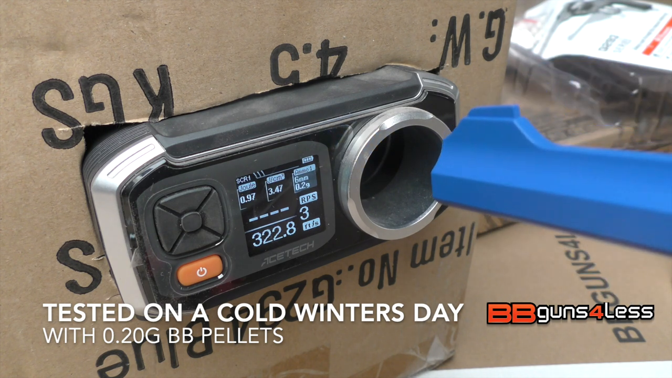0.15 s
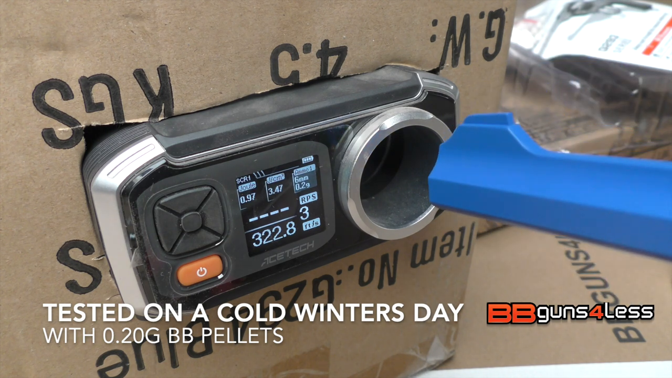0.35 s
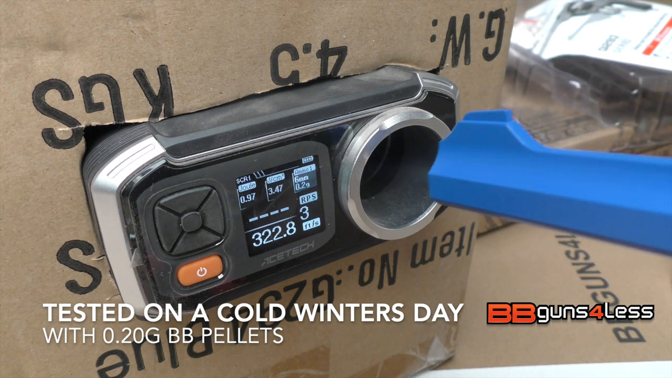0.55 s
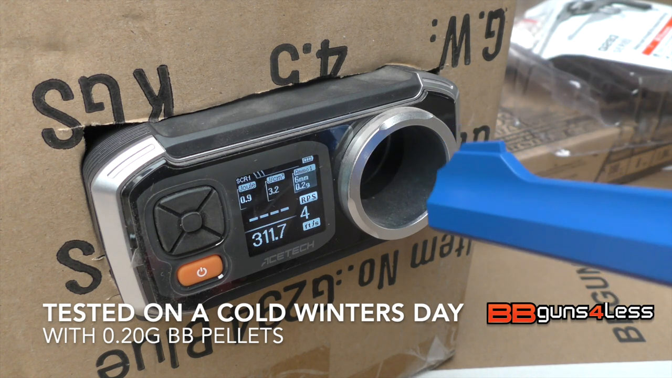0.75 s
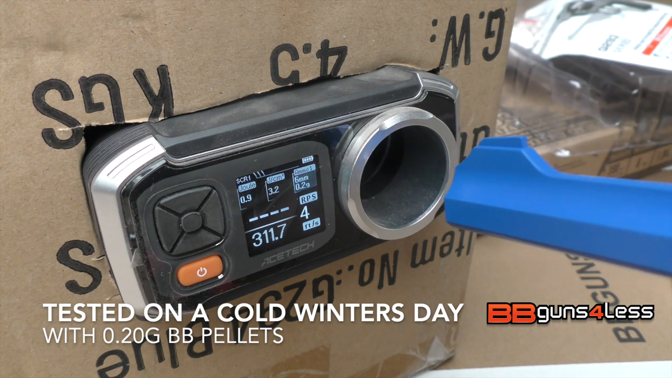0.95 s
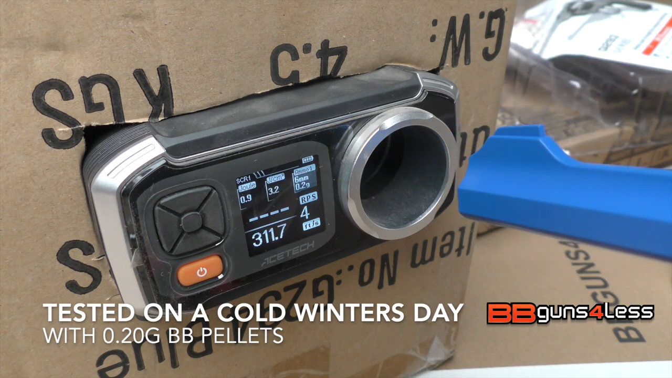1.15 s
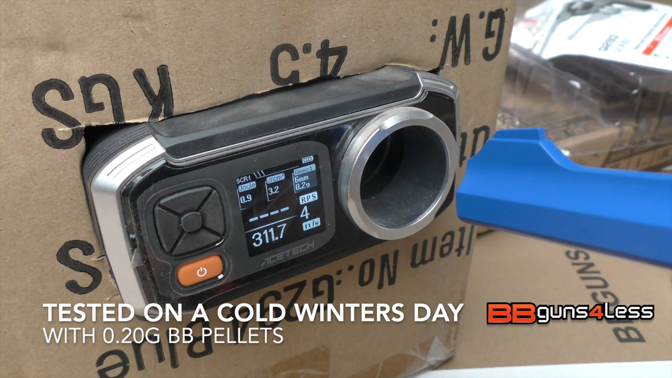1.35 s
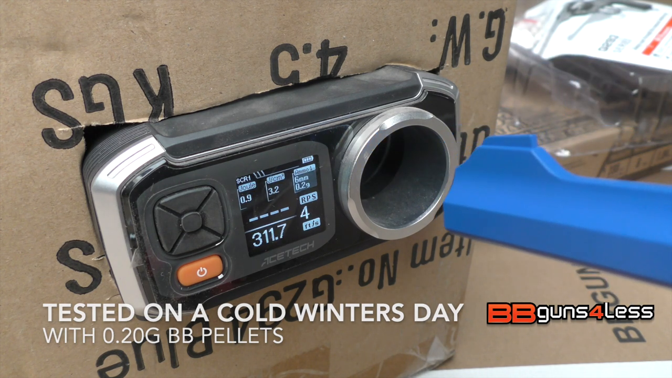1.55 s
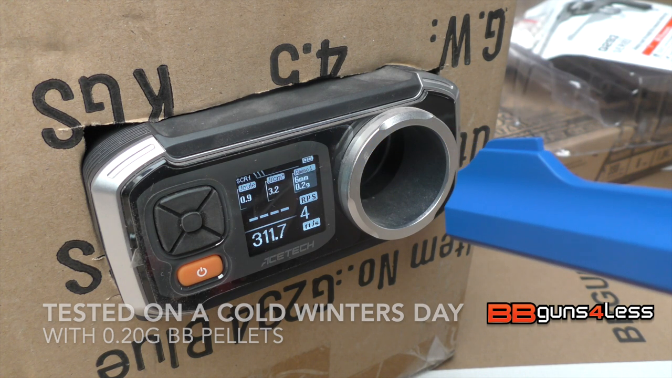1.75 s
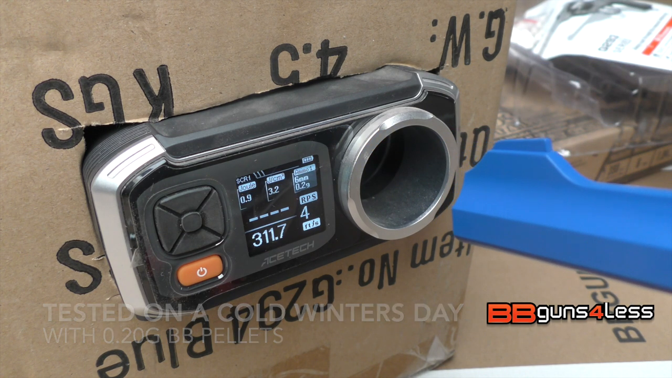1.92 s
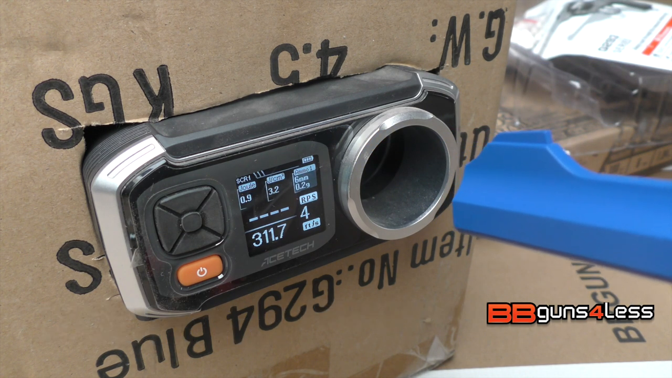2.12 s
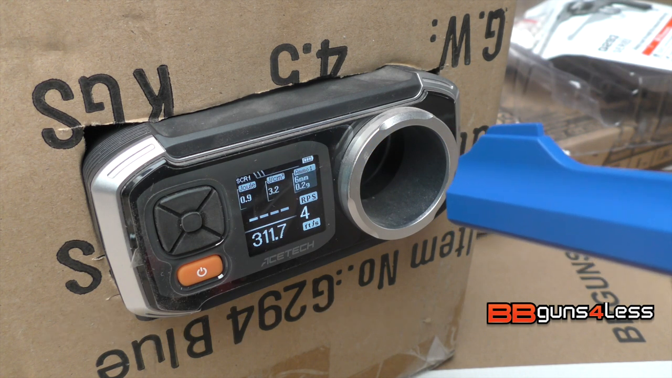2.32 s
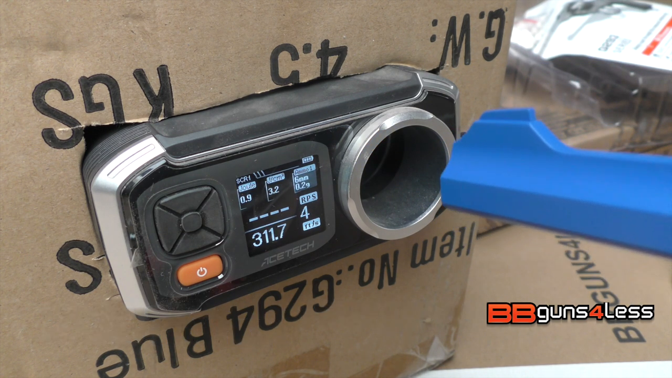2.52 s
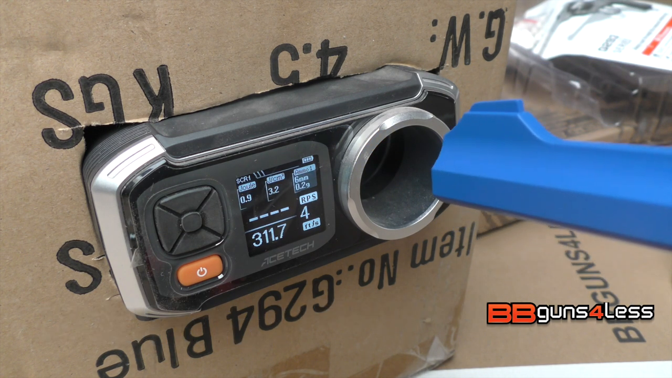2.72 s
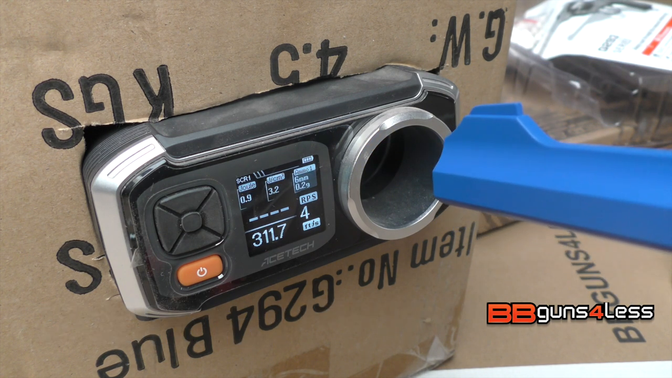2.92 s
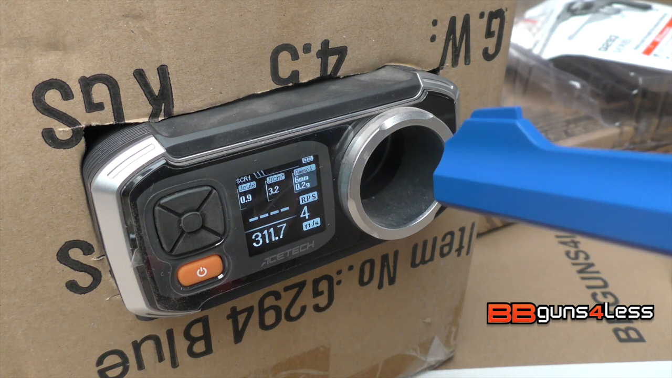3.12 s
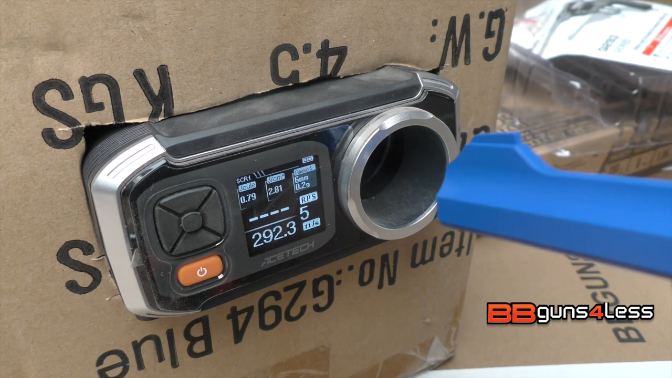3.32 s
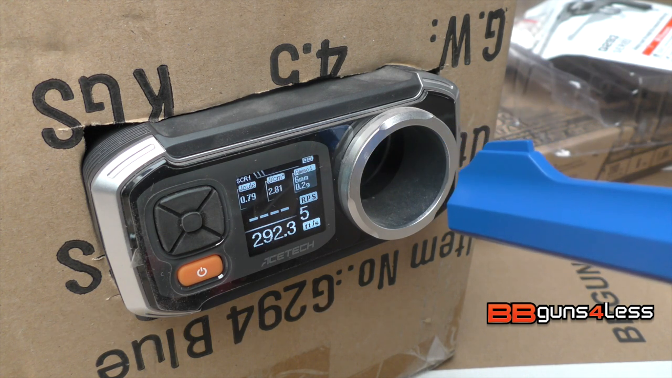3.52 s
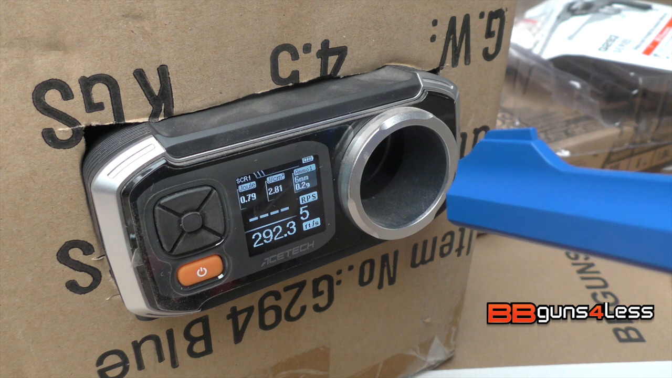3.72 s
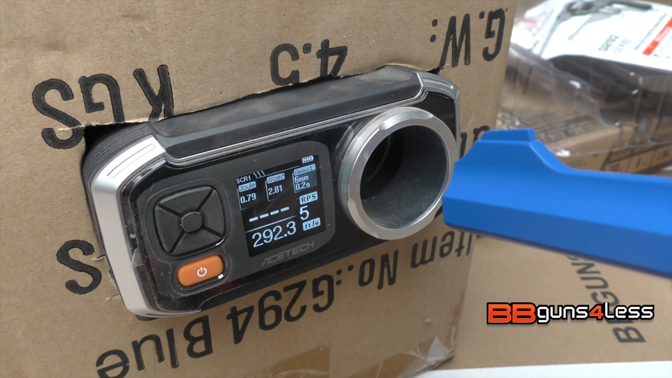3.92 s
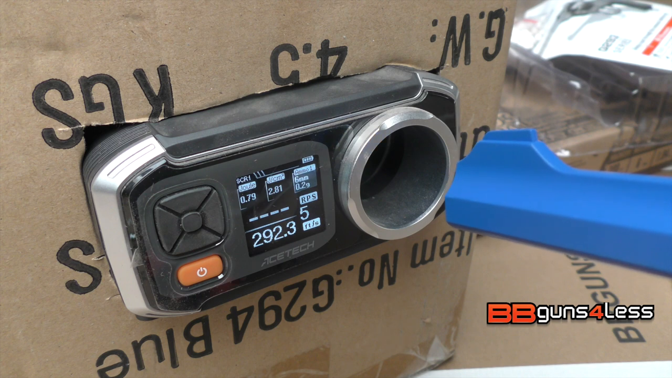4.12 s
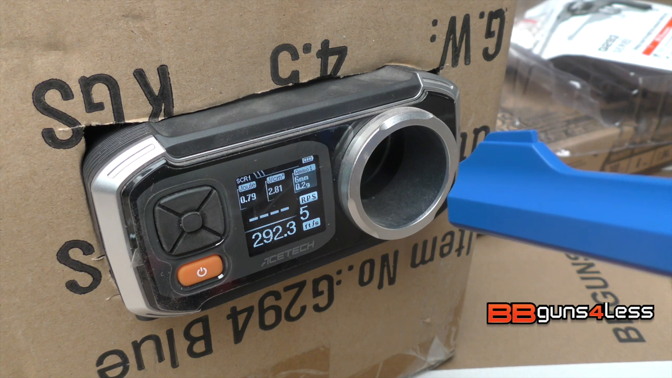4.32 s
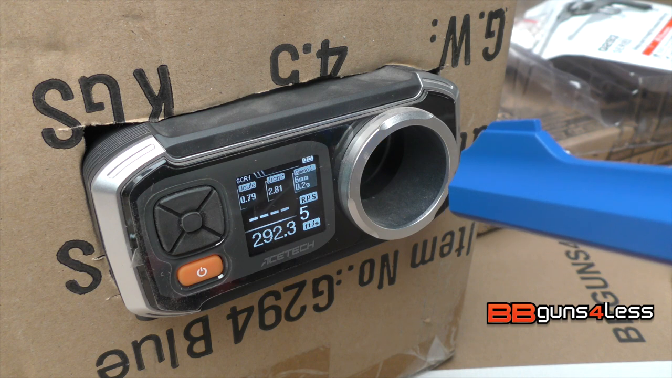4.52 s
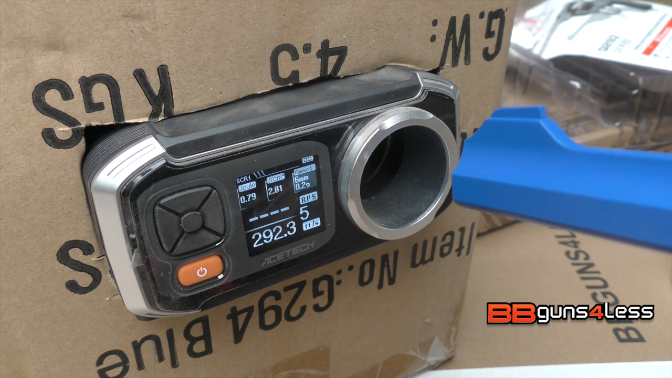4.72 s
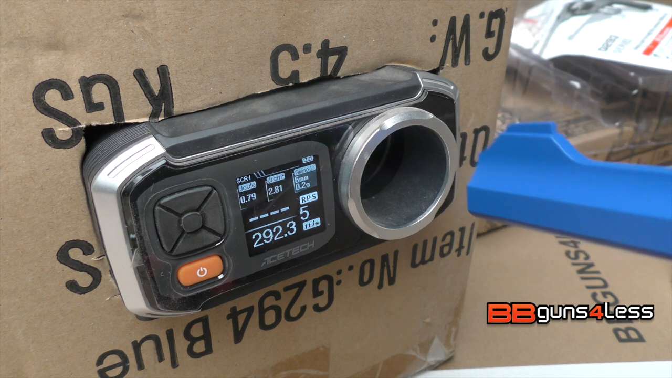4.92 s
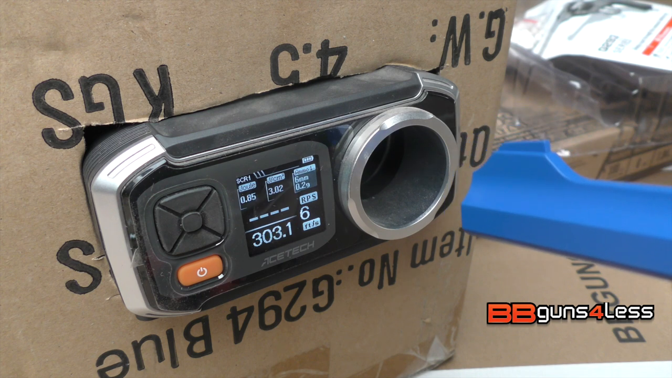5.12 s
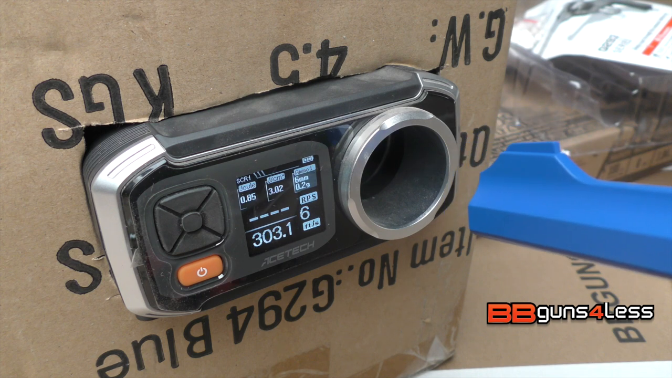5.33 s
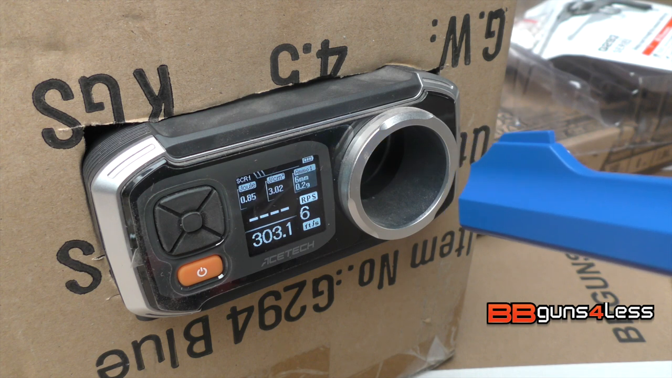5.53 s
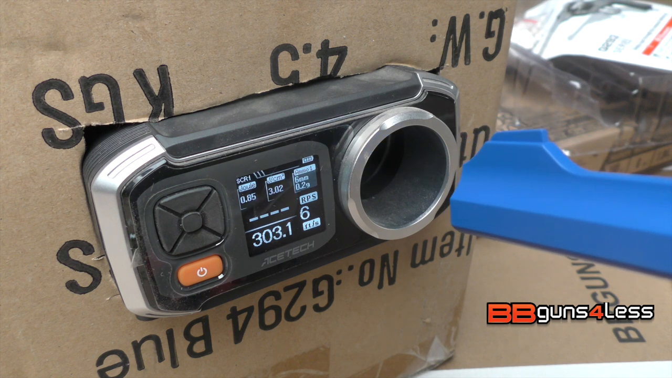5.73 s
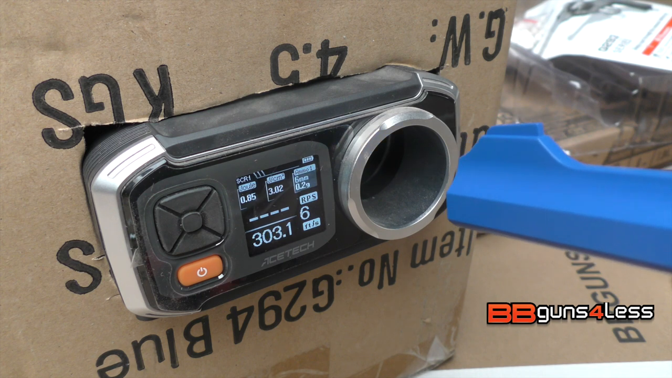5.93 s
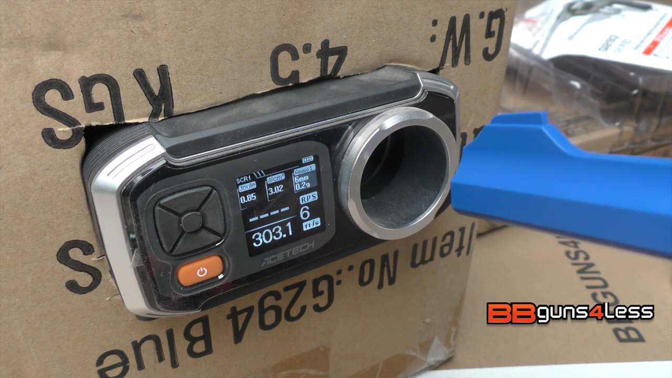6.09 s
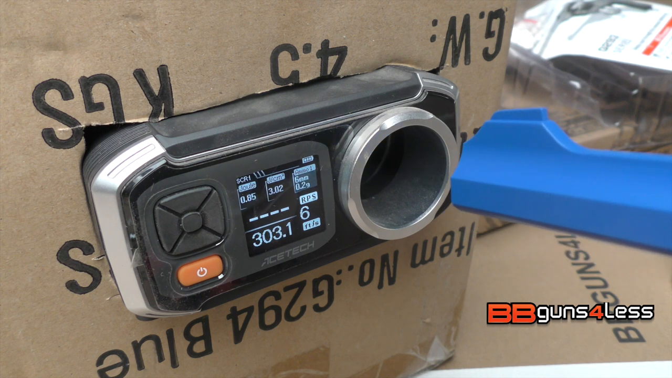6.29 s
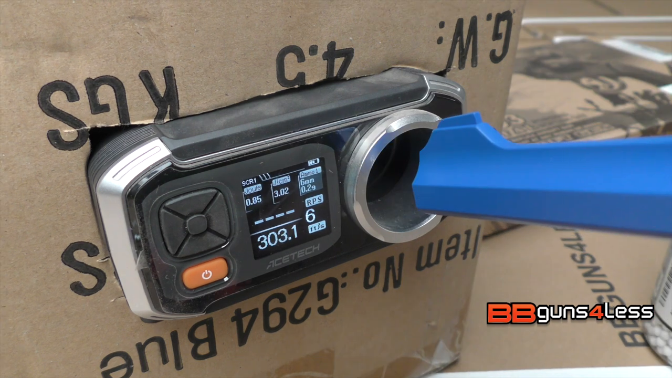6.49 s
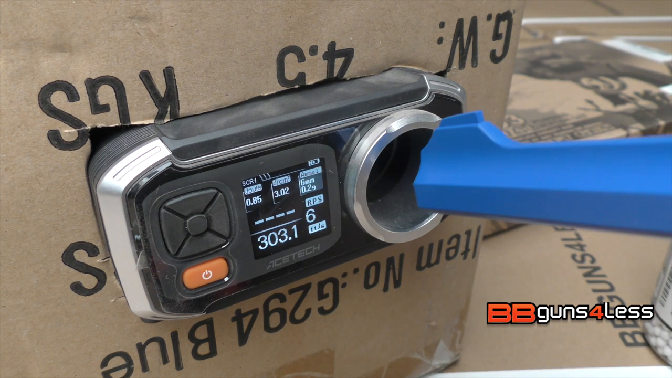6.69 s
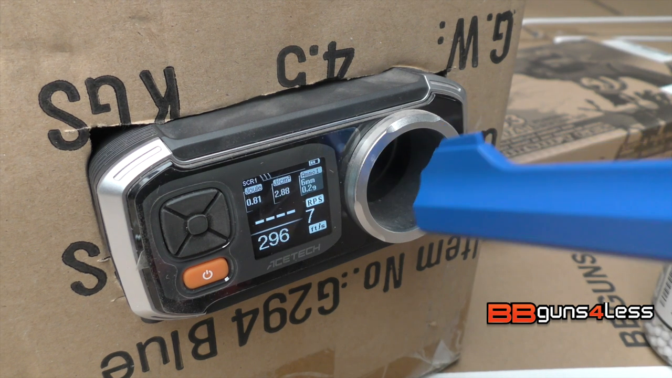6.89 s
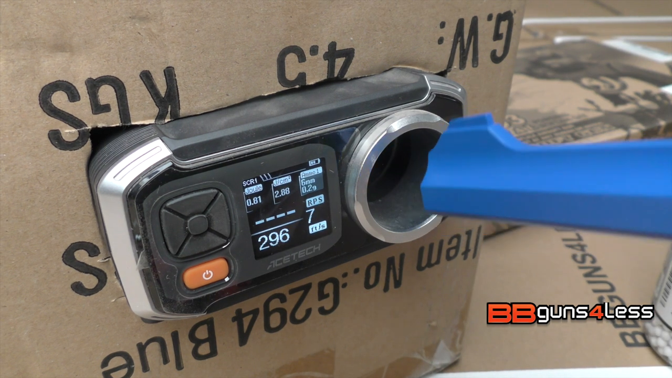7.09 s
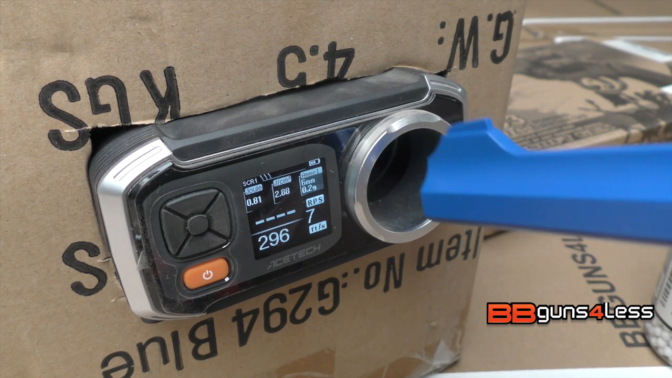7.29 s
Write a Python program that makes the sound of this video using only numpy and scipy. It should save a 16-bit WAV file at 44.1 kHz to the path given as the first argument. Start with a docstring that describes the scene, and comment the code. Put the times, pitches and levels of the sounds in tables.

```python
"""Four loud shots crack close to the microphone in a large stockroom: a gas revolver fires through a chronograph.
Each shot is a hammer click and a gas blast, made of coloured noise bursts; one flight later the pellet slaps
the far end. Spent pellets drop on boxes or skip over the hard floor, among knocks, scuffs and ventilation.
Decaying noise answers as the room. Gain control ducks after every loud crack, so the room's ring seems to hold
and swell as the gain comes back."""
import sys
import numpy as np
from scipy import signal
from scipy.fft import rfft, irfft
from scipy.io import wavfile
from scipy.ndimage import uniform_filter1d

SR = 44100
rng = np.random.default_rng(int(sys.argv[2]) if len(sys.argv) > 2 else 0)


def put_to_file(sound):
    """Save the sound as 16-bit audio at rate SR, in the file named by the first command-line argument."""
    columns = np.atleast_2d(sound).T  # one column per channel
    safe = np.clip(columns, -1, 1)
    whole_steps = np.round(safe * 32767)
    wavfile.write(sys.argv[1], SR, whole_steps.astype(np.int16))


N = 324135

SHORT = 8192  # samples in a short sound
T = np.arange(SHORT) / SR
HZ = np.fft.rfftfreq(SHORT, 1 / SR)
HUSH_S = 6.466  # sounds laid in before this moment stop short here

# The four shots. Each row: blast start in seconds, hammer lead in seconds, hammer level in dB,
# valve whistle level in dB, blast level in dB, level of the pellet's far slap in dB.
SHOTS = [(0.5663, 0.0092, -3, -8.5, 19.5, -24.5), (3.0606, 0.0089, -2.5, -15.5, 19.5, -18),
         (4.8991, 0.011, -2, -22.5, 19, -21), (6.7399, 0.011, 5, -23, 21, -22)]
# Stereo width of sounds close by. Each row: frequency in Hz, side minus mid in dB.
NEAR_WIDTH = [(100, 0.5), (400, -9), (1200, -2.5), (2500, -6.5), (5000, -9), (9000, -17.5), (14000, -7)]
# Stereo width of the room. Each row: frequency in Hz, side minus mid in dB.
ROOM_WIDTH = [(60, 3), (180, -7), (550, -8.5), (1650, -5), (4970, -10), (15000, -21)]


def amp(db):
    """Decibels to gain."""
    return 10 ** (np.asarray(db) / 20)


def rms(x):
    """Root mean square."""
    return np.sqrt(np.mean(x ** 2) + 1e-20)


def along(points, hz=HZ):
    """(Hz, value) points read on a log frequency axis."""
    f, v = np.transpose(points)
    return np.interp(np.log(hz + 1), np.log(f + 1), v)


def left_right(mid_side):
    """Mid and side to left and right."""
    mid, side = mid_side
    return np.array([mid + side, mid - side])


def pan(balance_db):
    """Gains of the two channels, left over right by balance_db."""
    return amp([[balance_db / 2], [-balance_db / 2]])


def causal(x, colour_db):
    """A short sound through the minimum-phase filter of that colour, found by folding the cepstrum."""
    cepstrum = irfft(np.log(amp(colour_db)))
    cepstrum[..., 1:SHORT // 2] *= 2
    cepstrum[..., SHORT // 2 + 1:] = 0
    return irfft(rfft(x) * np.exp(rfft(cepstrum)))


def burst(colour_db, t60, hold=0, width=NEAR_WIDTH):
    """A stereo burst of coloured noise that holds at about rms 1, then dies by 60 dB in t60 seconds."""
    envelope = amp(-60 * np.maximum(T - hold, 0) / t60)
    noise = rng.standard_normal((2, SHORT)) * envelope
    mid_side_db = np.array([colour_db, colour_db + along(width)])
    pair = left_right(causal(noise, mid_side_db))
    return pair * rms(envelope) / rms(pair)


def stereo_noise(colour, width):
    """Steady noise of the scene's length in that colour and stereo width, rms 1."""
    hz = np.fft.rfftfreq(N, 1 / SR)
    gain = amp(along(colour, hz) + np.array([0 * hz, along(width, hz)]))
    pair = left_right(irfft(rfft(rng.standard_normal((2, N))) * gain, N))
    return pair / rms(pair)


def add(track, s, sound):
    """Lay a sound in at s seconds; whatever was laid in before HUSH_S fades out there within 8 ms."""
    start = round(s * SR)
    part = sound[..., :N - start]
    t = (start + np.arange(part.shape[-1])) / SR
    fade = np.clip((HUSH_S - t) / .008 + .5, 0, 1) if s < HUSH_S else 1
    track[:, start:start + len(t)] += part * fade


def mix(*sounds):
    """Sum (delay in seconds, stereo sound) pairs into one sound."""
    parts = [np.pad(sound, ((0, 0), (round(s * SR), 0))) for s, sound in sounds]
    longest = max(part.shape[1] for part in parts)
    return sum(np.pad(part, ((0, 0), (0, longest - part.shape[1]))) for part in parts)


def room(colour_db, rise=.002, uneven_db=2.5, walls_db=3, blend_s=0.35, size=1024, count=120):
    """The stockroom's diffuse answer: coloured noise that builds up, then dies at each frequency's own pace."""
    # The stockroom's ring. Each row: frequency in Hz, time to die by 60 dB in seconds.
    ring_times = [(130, 0.24), (400, .7), (1100, 0.74), (2600, 0.89), (4000, 0.77), (6000, 0.64),
                  (9000, 0.42), (15000, 0.55)]
    hz = np.fft.rfftfreq(size, 1 / SR)
    frame_s = np.arange(count) * size / 2 / SR
    # each source spot feeds some frequencies more than others
    ripple_db = uneven_db * rng.standard_normal(len(hz))
    width_db = np.array([0 * hz, along(ROOM_WIDTH, hz)])
    gain = amp(np.interp(hz, HZ, colour_db) + ripple_db + width_db)
    gain /= np.sqrt(np.sum(gain ** 2) / len(hz))
    noise = rng.standard_normal((2, (count - 1) * size // 2))
    spectra = signal.stft(noise, nperseg=size)[2]
    decay = amp(-60 * frame_s / along(ring_times, hz)[:, None])
    tail = left_right(signal.istft(spectra * gain[..., None] * decay, nperseg=size)[1])
    # single wall echoes stand out at first, then blend
    t = np.arange(tail.shape[1]) / SR
    echoes = uniform_filter1d(rng.standard_normal(len(t)), size=64)
    echo_db = walls_db * echoes / rms(echoes) * np.exp(-t / blend_s)
    return tail * (1 - np.exp(-t / rise)) * amp(echo_db)


def thump():
    """A single push through the carton's low resonance, peak 1."""
    # The hollow answer of a struck carton. Each row: frequency in Hz, relative level in dB per Hz.
    hollow = [(25, -11.5), (70, 0.5), (160, -0.5), (330, -4), (460, -4), (680, -12.5), (2000, -36),
              (10000, -59)]
    pulse = causal(1. * (T == 0), along(hollow))
    return pulse / np.abs(pulse).max()


def blasts():
    """Gas jets from the muzzle, buffets the microphone and shakes the carton; the ceiling and the room answer."""
    # Colours of the jet, of the puff that buffets the microphone, of the shaken carton and of the room's ring.
    # Each row: frequency in Hz, relative level in dB per Hz.
    jet_colour = along([(20, -13.5), (150, 6), (350, 4), (700, -12), (1200, 0.5), (1800, -5.5), (2700, 5),
                        (4000, -5.5), (7000, -8.5), (11500, -1), (15000, -8), (21000, -13)])
    gust_colour = along([(25, -7), (100, 2), (350, 0), (550, -5.5), (800, -17.5), (2000, -44.5)])
    carton_colour = along([(20, 5.5), (100, -1), (330, -0.5), (650, -19.5), (1150, -7), (1800, -4),
                           (2800, -3.5), (5000, -7.5), (11000, -10.5), (16000, -27.5)])
    ring_colour = along([(30, -16), (80, -8.5), (150, 3), (300, -6.5), (650, -15.5), (1150, -6.5),
                         (1800, -5.5), (2800, -3.5), (4200, -1), (6500, -3), (9000, -2), (15000, -14)])
    # Resonances of the chronograph's tube, carried into the room by the blast.
    # Each row: centre in Hz, width in Hz, boost in dB.
    tube = [(1262, 150, 4), (2800, 170, 5), (4480, 80, -0.5)]
    valve_open_s, gust_s, ceiling_s = 0.0029, 0.0055, .0144
    gust_db, room_db = -13.5, -28  # relative to the blast

    out = np.zeros((2, N))
    tube_db = sum(db / (1 + ((HZ - hz) / width) ** 2) for hz, width, db in tube)
    for s, *_, blast_db, _ in SHOTS:
        gain = amp(blast_db)
        jet = burst(jet_colour, t60=0.017, hold=valve_open_s)
        add(out, s, gain * jet * pan(-1.3))
        # the puff swirls differently at each port, so it is wide
        gust = burst(gust_colour, t60=0.0085, hold=gust_s, width=[(60, 0), (400, 1)])
        add(out, s + 0.00074, gain * amp(gust_db) * gust)
        add(out, s + .003, gain * amp(-5.0) * burst(carton_colour, t60=0.055))
        # the ceiling returns the sharp front of the blast, less some treble
        echo_colour = jet_colour + along([(400, 2.0), (2500, -3), (12000, -5)])
        echo = burst(echo_colour, t60=0.011, hold=.002)
        add(out, s + ceiling_s, gain * (amp(-7.5) * echo + amp(-15) * thump()))
        add(out, s, gain * amp(room_db) * room(ring_colour + tube_db, rise=0.0042))
    return out


def hammer():
    """The hammer scrapes faintly as it swings, strikes the valve and rebounds, and the opening valve whistles."""
    # Colour of the hammer's steel. Each row: frequency in Hz, relative level in dB per Hz.
    steel_colour = along([(40, -22), (300, -20), (650, -31), (1100, -12), (1700, -7.5), (2500, -4),
                          (3800, -1), (6000, -7.5), (9000, -14.5), (14000, -16), (20000, -26.5)])
    bounce_s, bounce_db = .0026, -9.5  # one rebound on the valve, relative to the strike
    whistle_colour = -10 * np.log10(1 + ((HZ - 10000) / 350) ** 4)  # a narrow band at 10 kHz

    out = np.zeros((2, N))
    for s, lead, hammer_db, whistle_db, *_ in SHOTS:
        strike = s - lead
        add(out, strike - .006, amp(-40.5) * burst(steel_colour, t60=.01, hold=0.0042))
        add(out, strike, amp(hammer_db) * burst(steel_colour, t60=0.011, hold=0.00046))
        rebound = burst(steel_colour, t60=0.014, hold=.001)
        add(out, strike + bounce_s, amp(hammer_db + bounce_db) * rebound)
        whistle = burst(whistle_colour, t60=.012, hold=0.0012)
        add(out, strike + bounce_s, amp(whistle_db) * whistle)
    return out


def far_hit(direct_db, tilt_db):
    """A pellet's slap at the far end arrives smeared, with much of the room; tilt_db is dB per octave."""
    # Colour of the far end. Each row: frequency in Hz, relative level in dB per Hz.
    far_colour = [(40, -23), (300, -13), (700, -25), (1150, -0.5), (1700, 3.5), (2500, 6), (4000, -0.5),
                  (6000, -3.5), (9000, -1.5), (15000, -17)]
    colour = along(far_colour) + tilt_db * np.log2(np.maximum(HZ, 500) / 2000)
    direct = amp(direct_db) * burst(colour, t60=0.11, hold=0.00099, width=ROOM_WIDTH)
    return mix((0, direct), (0, room(colour, rise=0.0011)))


def far_hits():
    """Every pellet strikes the far end one flight after its shot; spent ones drop on boxes later."""
    # Spent pellets dropping on boxes at the far end. Each row: start in seconds, level in dB.
    rebounds = [(3.765, -37), (5.142, -33.5), (6.311, -34), (6.955, -33.5), (7.082, -33.5)]
    flight_s = .1068  # a pellet's flight to the far end plus the sound's way back
    out = np.zeros((2, N))
    for s, *_, slap_db in SHOTS:
        add(out, s + flight_s, amp(slap_db) * far_hit(direct_db=14.5, tilt_db=-1.9))
    for s, db in rebounds:
        # slower, so softer and duller
        add(out, s, amp(db) * far_hit(direct_db=10, tilt_db=-2.66))
    return out


def skips(ping_db=5, ping_width_hz=600):
    """Hard pellet on hard floor: bright contacts light up the room, each flight shorter, each bounce weaker."""
    # Skipping pellets. Each row: start in seconds, level in dB, number of contacts.
    runs = [(3.512, -29.5, 1), (5.282, -37.5, 1), (5.582, -35, 1), (5.800, -38, 4), (6.198, -36.5, 1),
            (6.338, -41, 1), (7.094, -30.5, 1)]
    # Colour of a contact. Each row: frequency in Hz, relative level in dB per Hz.
    floor_colour = along([(100, -18.5), (700, -20.5), (1200, -8.5), (2500, -11.5), (4000, -9), (6000, -7),
                          (9000, -3), (12000, -6), (16000, -15)])
    flight_s, shrink = .109, .72  # first flight; each next flight over the one before
    loss_db, direct_db = 2.5, 7  # loss at each bounce; direct sound over the room's ring
    mean_ping_hz, ping_scatter = 8770, 0.14  # relative spread from contact to contact

    out = np.zeros((2, N))
    for first, db, count in runs:
        for k in range(count):
            s = first + flight_s * (1 - shrink ** k) / (1 - shrink)
            ping_hz = mean_ping_hz * (1 + ping_scatter * rng.standard_normal())
            colour = floor_colour + ping_db / (1 + ((HZ - ping_hz) / ping_width_hz) ** 2)
            gain = amp(db - loss_db * k)
            add(out, s, gain * amp(direct_db) * burst(colour, t60=0.12, width=ROOM_WIDTH))
            add(out, s, gain * room(colour, rise=0.0093))
    return out


def ticks():
    """Ricochets click on something hard beside the microphone: very short noise bursts with a faint room."""
    # Sharp ticks close by. Each row: start in seconds, level in dB.
    clicks = [(0.7536, -7), (0.76, 2), (3.2296, -12), (5.0944, -6), (6.914, -5.5)]
    # Colour of a tick. Each row: frequency in Hz, relative level in dB per Hz.
    click_colour = along([(100, -26), (800, -17.5), (3000, -5), (7000, -3.5), (11000, -3), (15000, -5.5),
                          (20000, 4)])
    out = np.zeros((2, N))
    for s, db in clicks:
        add(out, s, amp(db) * burst(click_colour, t60=0.0075, hold=0.0033) * pan(-2.5))
        add(out, s, amp(db - 34.0) * room(click_colour, rise=0.004))
    return out


def knock(db, centre_hz, room_db, spread_octaves=0.7, scatter_db=2, port_phase=.5):
    """One knock rings the modes near its centre frequency; the firmer it is, the more it cracks and thumps."""
    # What the knocks ring with. Each row: mode in Hz, level in dB, time to die by 60 dB in seconds.
    modes = [(400, -14.5, .03), (1040, -0.5, 0.027), (1555, 1, 0.015), (2065, -3.5, 0.018),
             (2520, -3, 0.012), (3000, 1.5, 0.0086), (3660, 2, .009), (4400, -5, .009)]
    # Colours of the crack and of the boxes around. Each row: frequency in Hz, relative level in dB per Hz.
    crack_colour = along([(100, 4), (700, 0), (3000, -4), (6000, -5), (10000, -2.5), (16000, -16.5)])
    box_colour = along([(50, -22), (350, 1), (650, -12), (1100, -4), (1700, -2.5), (2300, 2.5), (3200, 0),
                        (4100, -5.5), (6000, -19), (9000, -6.5), (15000, -35)])
    firm_db = -18  # above this level crack and thump grow faster than the knock itself
    crack_db, crack_growth = -8, 0.51  # relative to the ring; extra dB per dB above firm
    thump_db, thump_growth = -30, 1.66

    hz, mode_db, t60 = np.transpose(modes)[..., None]
    # neighbouring modes swing opposite ways, which fills the gaps between them
    signs = (-1.) ** np.arange(len(modes))[:, None]
    strength, phase = rng.standard_normal((2, 2, len(modes), 1))
    nearness = 1 / (1 + (np.log2(hz / centre_hz) / spread_octaves) ** 2)
    weight = amp(mode_db + scatter_db * strength) * nearness
    swing = np.sin(2 * np.pi * hz * T + port_phase * phase)
    ring = np.sum(signs * weight * amp(-60 * T / t60) * swing, axis=1)
    ring /= rms(ring[:, :SR // 500])  # level set over the first 2 ms
    firmness_db = max(db - firm_db, 0)
    crack = amp(crack_db + crack_growth * firmness_db) * burst(crack_colour, t60=0.013)
    low = amp(thump_db + thump_growth * firmness_db) * thump()
    # the boxes around throw the knock back, blurred
    boxes = amp(-17.5) * burst(box_colour, t60=0.044, hold=0.0025)
    tail = amp(room_db) * room(box_colour, rise=0.0013)
    return amp(db) * mix((0, ring + crack - low), (0.0051, boxes), (0, tail))


def knocks():
    """The gun's action clacks and pellets rattle on boxes close by, each a struck set of modes."""
    # Near knocks. Each row: start in seconds, level in dB, centre in Hz, room relative to the knock in dB.
    strikes = [(2.1212, -43.5, 2360, -23), (2.2506, -50, 2800, -20), (3.039, -39.5, 2400, -1),
               (4.416, -55, 3400, -20), (4.5244, -46, 2480, -30), (4.535, -44, 3000, -39),
               (4.5671, -48.5, 2280, -36), (4.7084, -5.5, 2300, -25), (5.1713, -4.5, 2900, -25.5),
               (5.5190, -4.5, 2740, -34.5), (5.7391, -18.5, 2580, -36), (5.762, -28, 2100, -25),
               (5.780, -20, 1890, -27), (5.820, -31, 1650, -37), (5.867, -40.5, 1200, -31),
               (5.977, -44.5, 1210, -5), (6.6898, -43.5, 2760, -10)]
    out = np.zeros((2, N))
    for s, db, centre_hz, room_db in strikes:
        add(out, s, knock(db, centre_hz, room_db))
    return out


def scuffs():
    """Cardboard rubs briefly and booms near its panel resonance."""
    # Dull scuffs of cardboard. Each row: start in seconds, level in dB.
    rubs = [(5.135, -35.5), (5.23, -38), (5.279, -40)]
    # Colour of the panel. Each row: frequency in Hz, relative level in dB per Hz.
    panel_colour = along([(100, -29), (250, -13), (380, 1), (520, -14), (800, -15), (3000, -14),
                          (10000, -42)])
    out = np.zeros((2, N))
    for s, db in rubs:
        add(out, s, amp(db) * burst(panel_colour, t60=0.089, hold=0.017, width=ROOM_WIDTH))
    return out


def swishes():
    """Soft rubbing noise, as of a sleeve, swells and fades with each move of the arm while the gun is aimed."""
    # Faint swishes. Each row: start in seconds, length in seconds, peak level in dB.
    moves = [(1.399, 0.26, -57.5), (2.026, 0.097, -58), (2.11, 0.3, -59.5), (2.4, .29, -55)]
    # Colour of the rubbing. Each row: frequency in Hz, relative level in dB per Hz.
    sleeve_colour = [(300, -18), (1400, 8.5), (3000, 1), (5000, -3), (8000, -8.5), (13000, -8.5),
                     (16000, -23)]
    t = np.arange(N) / SR
    strokes = sum(amp(db) * np.sin(np.pi * np.clip((t - s) / length, 0, 1)) for s, length, db in moves)
    return strokes * stereo_noise(sleeve_colour, ROOM_WIDTH)


def air():
    """The steady murmur of ventilation under a thin hiss: noise through a fixed colour."""
    # Colour of the air. Each row: frequency in Hz, relative level in dB per Hz.
    murmur_colour = [(15, -47.5), (25, -27.5), (59, -9), (119, -3.5), (322, -12.5), (359, -13), (614, -27),
                     (666, -18.5), (782, -25.5), (945, -16.5), (1800, -19), (2120, -26), (3720, -30.5),
                     (5280, -39.5), (15500, -33)]
    # Its stereo width. Each row: frequency in Hz, side minus mid in dB.
    murmur_width = [(60, -9), (240, -8), (950, -12), (3770, -1.5), (15000, -10)]
    return amp(-55) * stereo_noise(murmur_colour, murmur_width)


def scene():
    """Gun, pellets and room together."""
    gun = hammer() + blasts()
    pellets = far_hits() + skips() + ticks()
    return gun + pellets + knocks() + scuffs() + swishes() + air()


def gain_control(x, threshold_db=-16, slope=0.8, release_db_per_s=90, size=64):
    """Turns down at once when the level passes the threshold, then comes back at a steady pace."""
    power = np.abs(uniform_filter1d(np.mean(x ** 2, axis=0), size))
    level_db = 10 * np.log10(power + 1e-12)
    wanted_db = slope * np.maximum(level_db - threshold_db, 0)
    # a running maximum against a rising ramp lets the cut shrink linearly
    ramp_db = release_db_per_s * np.arange(N) / SR
    cut_db = np.maximum.accumulate(wanted_db + ramp_db) - ramp_db
    return x * amp(-uniform_filter1d(cut_db, size // 4))


def record(dry):
    """Gain control, clipping at full scale and a steep band limit."""
    top_hz = 15900
    clipped = np.clip(gain_control(dry), -1, 1)
    hz = np.fft.rfftfreq(N, 1 / SR)
    return irfft(rfft(clipped) / np.sqrt(1 + (hz / top_hz) ** 160), N)


dry = scene()
out = record(dry)
put_to_file(out)
```